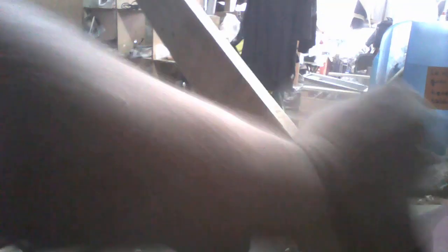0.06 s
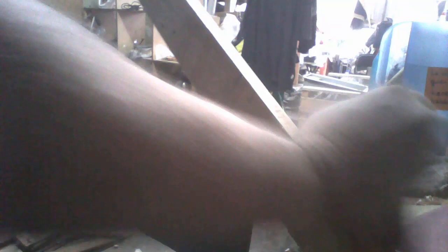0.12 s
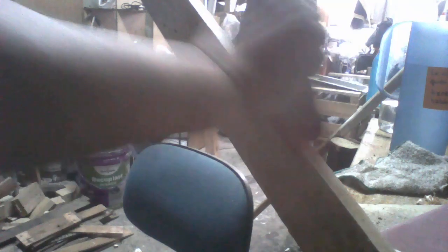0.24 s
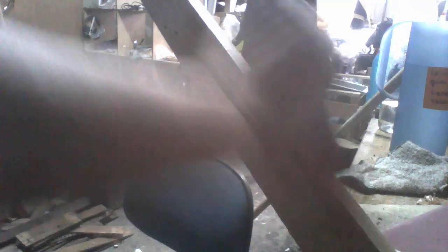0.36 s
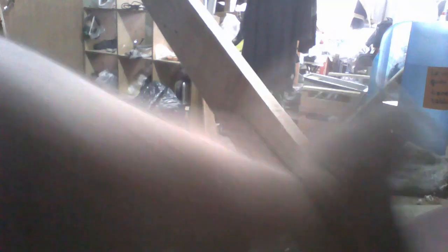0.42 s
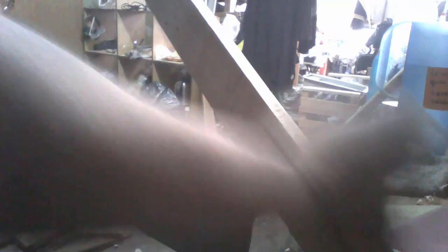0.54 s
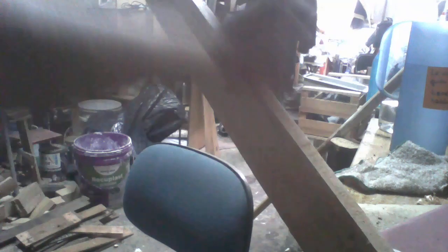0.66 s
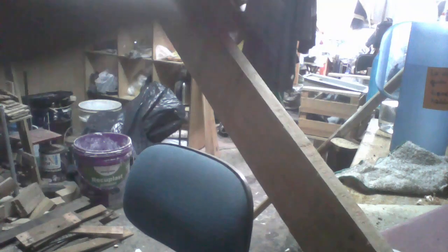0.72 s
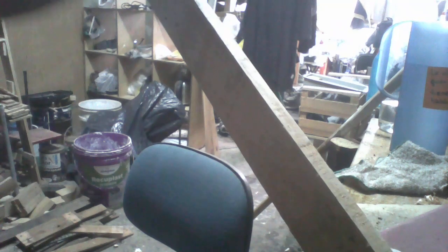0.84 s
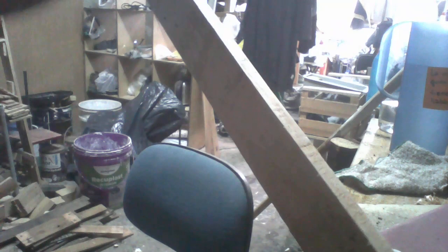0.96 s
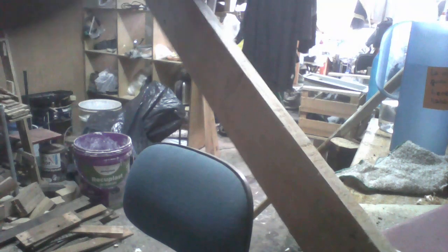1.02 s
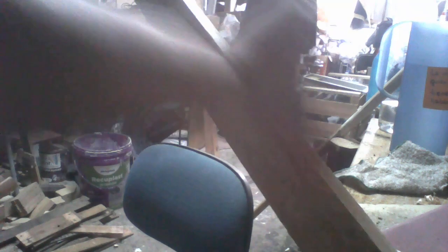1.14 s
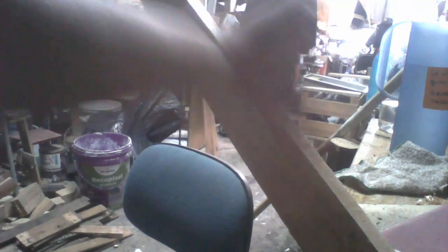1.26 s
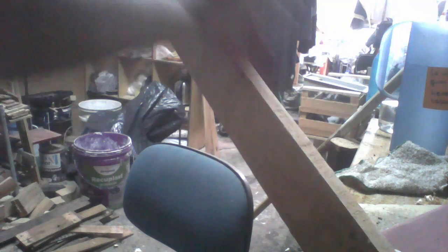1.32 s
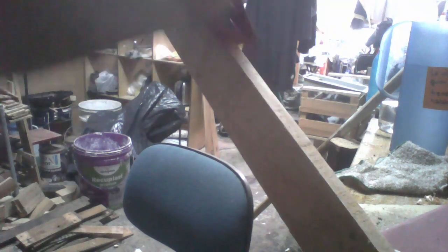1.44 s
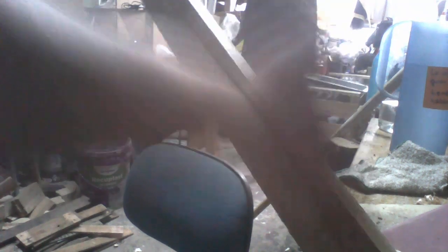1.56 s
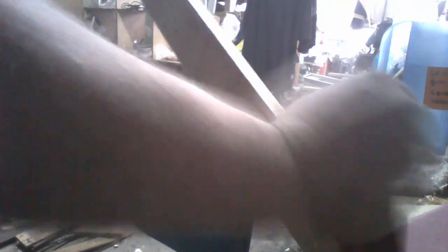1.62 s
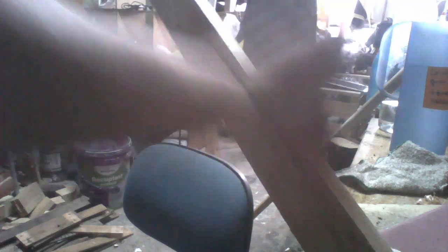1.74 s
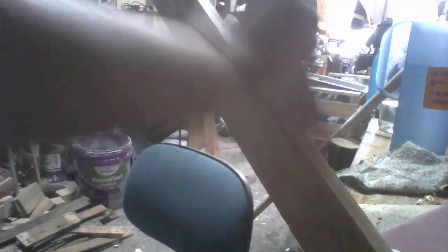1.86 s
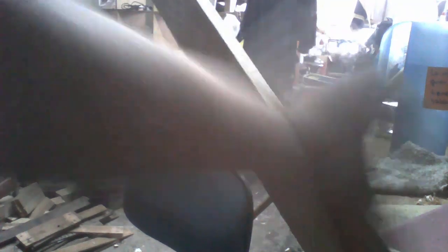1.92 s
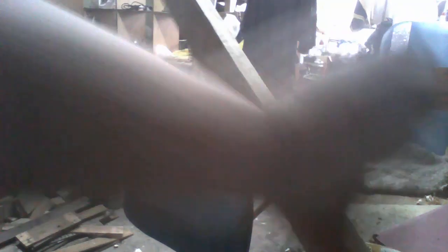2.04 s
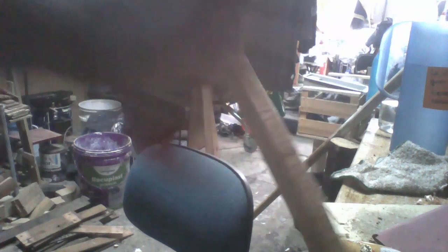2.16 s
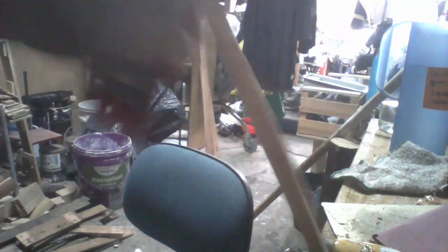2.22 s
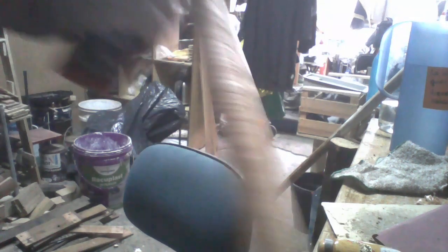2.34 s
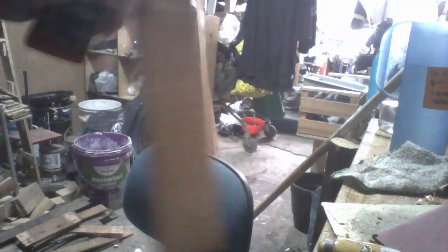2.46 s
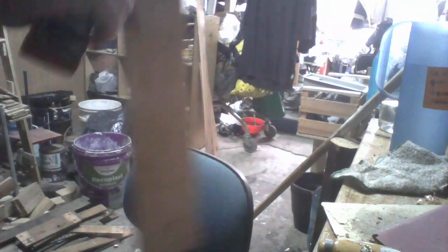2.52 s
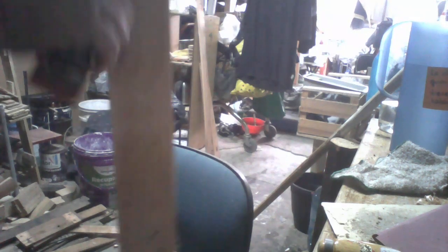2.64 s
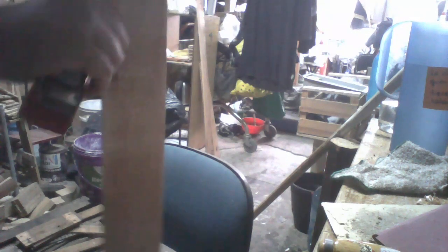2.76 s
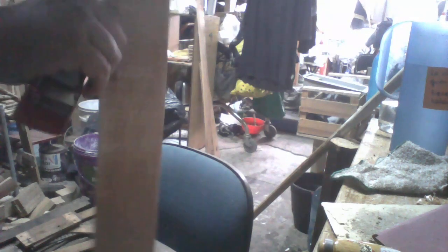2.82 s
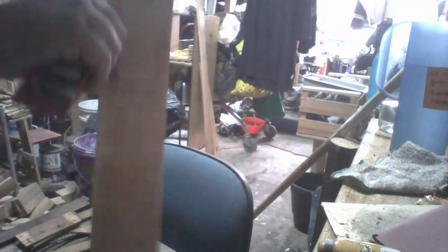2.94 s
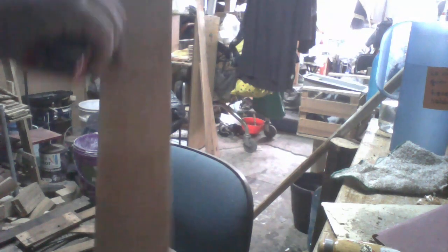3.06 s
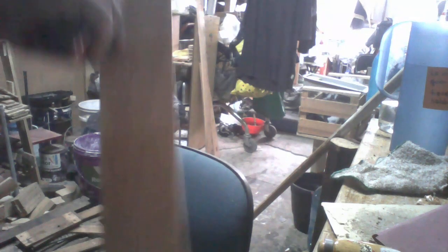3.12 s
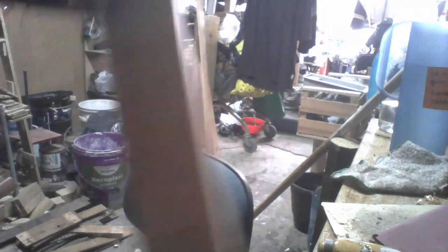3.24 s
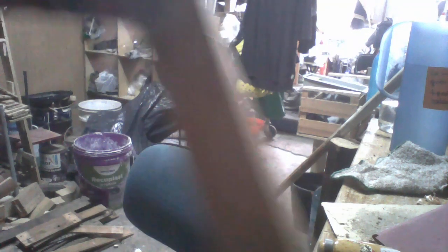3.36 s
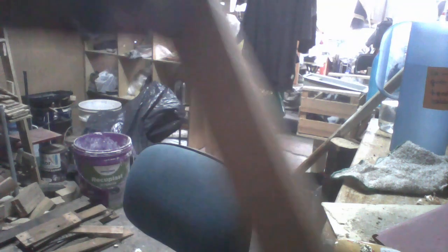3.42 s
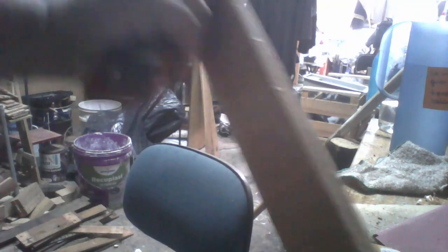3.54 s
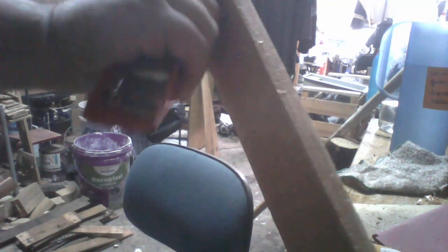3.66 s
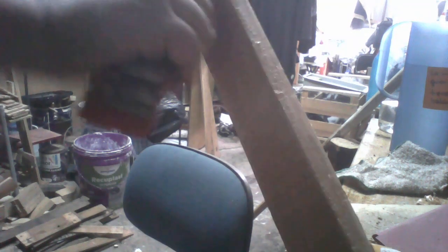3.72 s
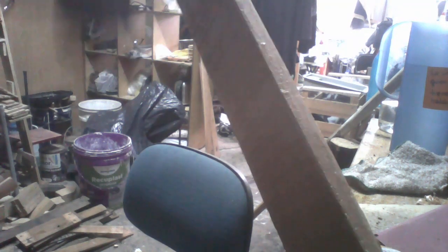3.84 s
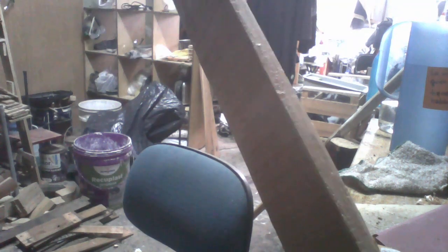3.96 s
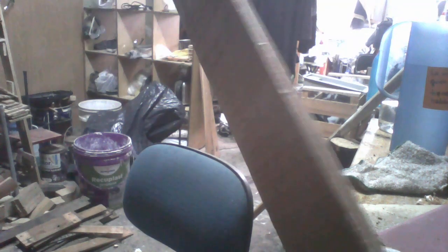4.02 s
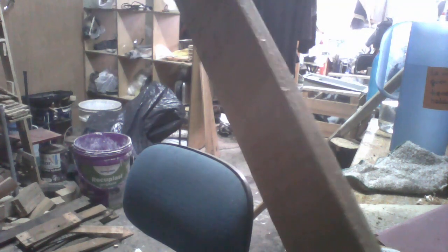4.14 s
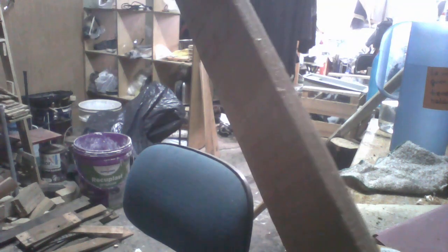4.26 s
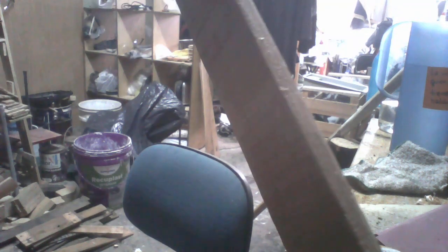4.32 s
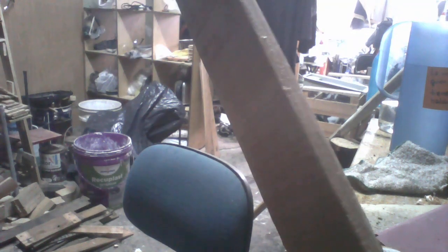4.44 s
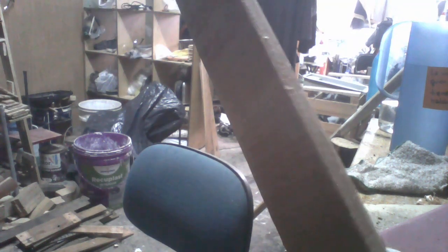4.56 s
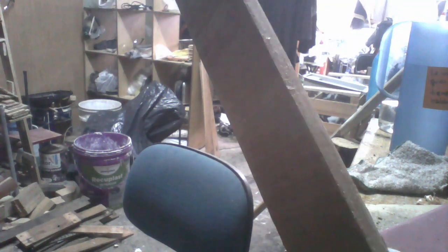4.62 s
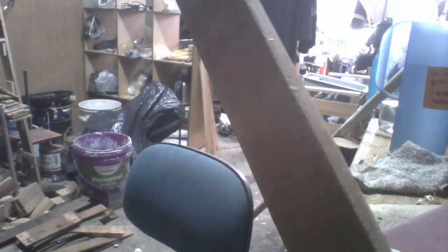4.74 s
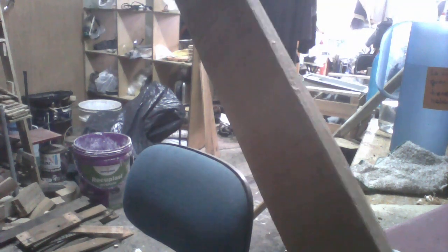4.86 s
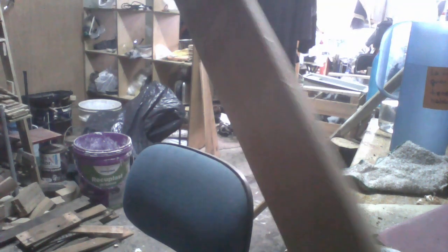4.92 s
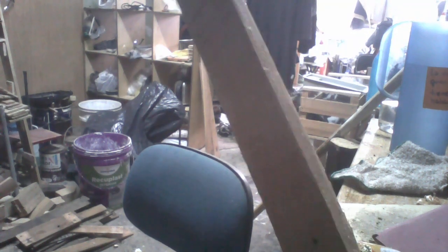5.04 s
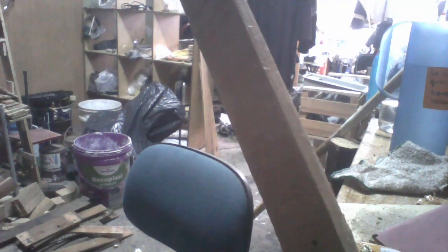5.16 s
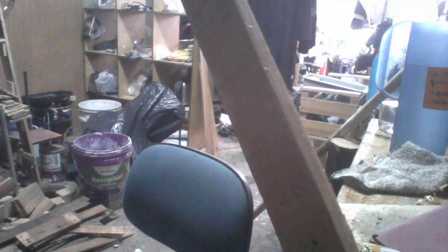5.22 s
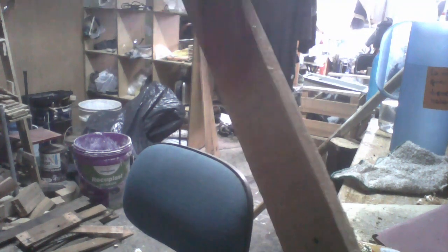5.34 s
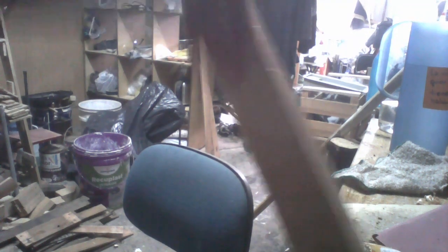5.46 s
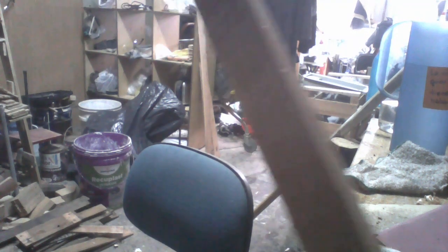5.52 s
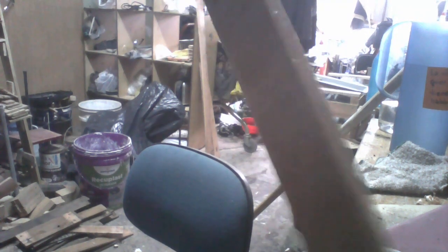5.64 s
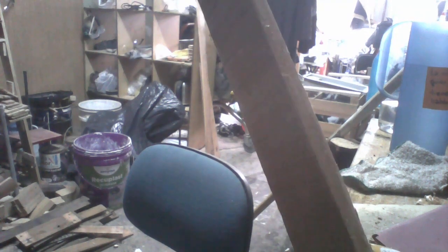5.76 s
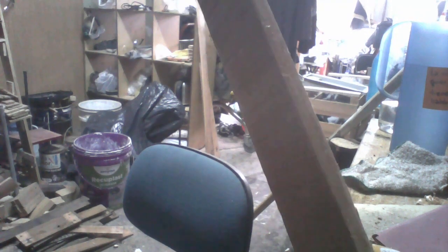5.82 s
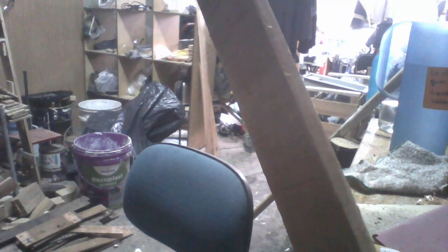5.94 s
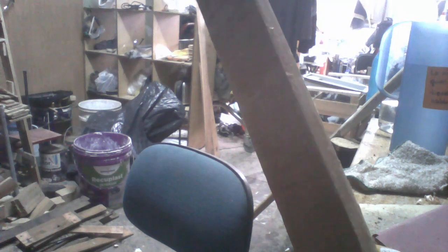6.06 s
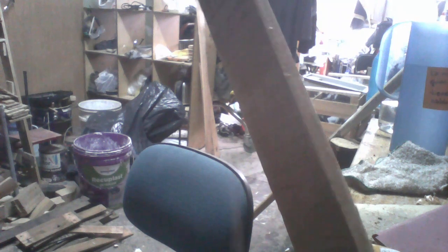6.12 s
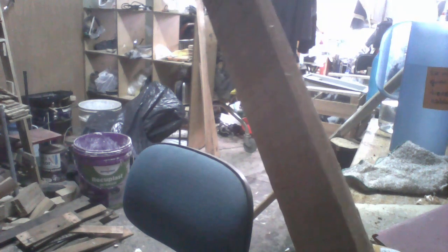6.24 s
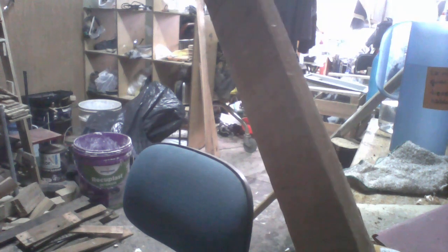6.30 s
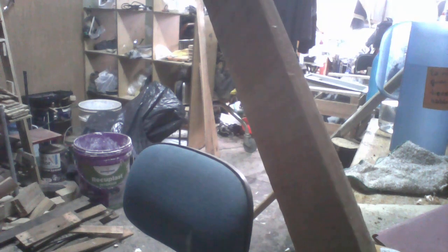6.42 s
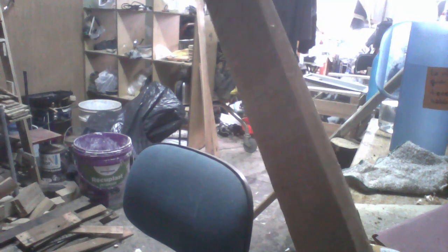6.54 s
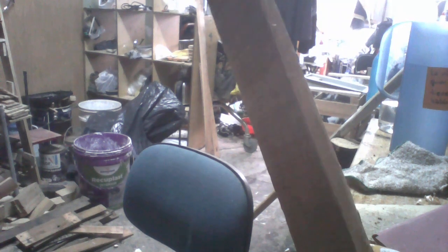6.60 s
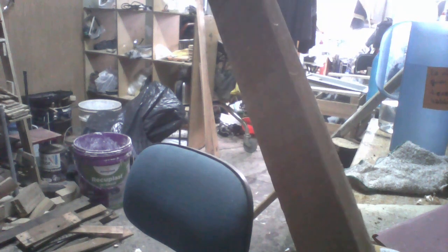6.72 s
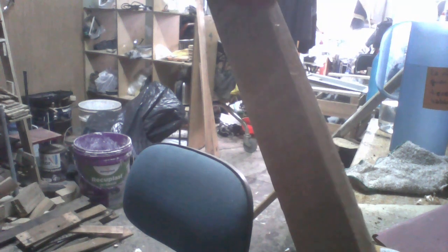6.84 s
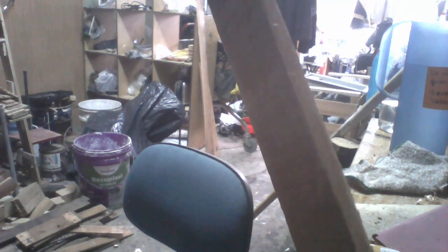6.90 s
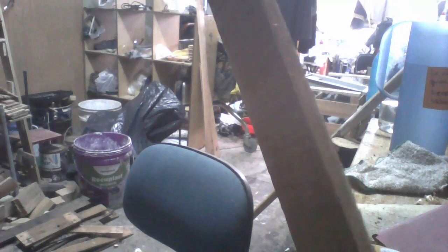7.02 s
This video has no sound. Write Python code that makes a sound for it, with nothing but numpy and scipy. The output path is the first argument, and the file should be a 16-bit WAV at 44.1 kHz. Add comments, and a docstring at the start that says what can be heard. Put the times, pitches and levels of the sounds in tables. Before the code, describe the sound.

Rapid uneven scraping of wood, fibres tearing and the board humming, with snags and tiny squeaks. A mostly quiet pause follows, holding soft dry hand rubbing, a heavy board thump and a hard woody clack. Then broad forceful strokes return with knocks and crunching until the end. Close single microphone, short room reverberation, deep rumble following the shaking, clipped peaks and faint background air.

```python
"""A hand scraper works to and fro along a wooden board: torn fibres hiss, stick-slip rasps, board modes drone.
From the start the edge also catches on the grain, ticking and jolting the board, and at moments it squeaks.
In a pause the board is turned in the hand with dry rubbing and set down with a thump; then a hard piece clacks.
Scraping resumes, with further thumps among the strokes; the loudest blows overload.
Short reverberation, a rumble that follows the shaking and steady air noise lie beneath."""
import sys
import numpy as np
from scipy import signal
from scipy.fft import rfft, irfft
from scipy.io import wavfile

SR = 44100
rng = np.random.default_rng(int(sys.argv[2]) if len(sys.argv) > 2 else 0)


def output_pcm(signal):
    """Save a mono or channel-first signal as 16-bit PCM at the path in sys.argv[1].

    Samples are clipped to [-1, 1] before scaling.
    """
    pcm = np.clip(np.atleast_2d(signal).T, -1, 1) * 32767
    wavfile.write(sys.argv[1], SR, np.round(pcm).astype(np.int16))


N = 312228
TIME = np.arange(N) / SR
RING = TIME[:SR // 2]  # time axis of short sounds and impulse responses, 0.5 s

# Levels in the tables are relative: each source applies its own overall gain.
# scraper strokes: fastest moment t/s, rise/s, fall/s, hiss level/dB, rasp level/dB, drone level/dB
SCRAPER_STROKES = [(0.025, 0.3, 0.13, -24.5, -25, -8.5), (0.175, .04, 0.071, -33, -32, -28),
                   (0.265, 0.065, .05, -30.5, -32.5, -21), (0.445, 0.14, 0.063, -23, -29, -10.5),
                   (0.595, 0.036, 0.068, -33, -23.5, -19), (0.64, 0.12, 0.14, -25.5, -24.5, -12.5),
                   (0.78, 0.087, 0.15, -32.5, -32.5, -24), (1.14, 0.21, .11, -24, -26.5, -11.5),
                   (1.285, 0.082, .06, -31, -34, -30), (1.355, 0.074, 0.083, -33, -32.5, -23.5),
                   (1.605, 0.15, 0.085, -23, -22.5, -5), (1.79, 0.16, 0.049, -29, -26.5, -16.5),
                   (1.92, 0.098, 0.077, -26, -24, -12), (2.355, 0.07, 0.07, -35, -27, -20.5),
                   (4.62, 0.12, 0.12, -20, -24.5, -9.5), (4.878, 0.0055, .12, -35, -33, -54),
                   (4.995, .11, 0.098, -23.5, -22, -17.5), (5.18, 0.088, 0.13, -34.5, -41, -38),
                   (5.315, 0.13, 0.094, -23.5, -23.5, -14), (5.49, 0.056, .06, -41, -39.5, -34),
                   (5.668, 0.0072, 0.1, -32.5, -35.5, -46), (6.035, 0.14, 0.068, -20.5, -26, -5.5),
                   (6.235, 0.23, 0.11, -31, -31, -25), (6.455, 0.14, 0.062, -21.5, -27.5, -11),
                   (6.59, 0.16, 0.086, -31.5, -28.5, -21.5), (6.785, .11, 0.069, -18, -24, -5.5),
                   (6.93, 0.22, 0.29, -33.5, -35.5, -26.5), (7.08, 0.058, .1, -26, -29, -15)]
# slides of the board through the hand: fastest moment t/s, rise/s, fall/s, hiss level/dB, ringing level/dB
BOARD_SLIDES = [(2.05, .1, 0.41, -49.5, -50), (2.5, 0.18, 0.1, -43.5, -42), (2.61, .025, 0.065, -52, -41),
                (2.76, 0.11, 0.06, -40.5, -48), (2.83, .03, 0.03, -34.5, -37),
                (3.11, 0.39, 0.31, -43, -46.5), (3.34, 0.037, 0.11, -38, -45),
                (3.49, .16, 0.15, -33, -41.5), (3.95, 0.59, 0.25, -48, -57.5),
                (4.26, 0.095, 0.046, -34.5, -56), (4.39, 0.051, 0.058, -43, -46)]
# sharp contacts, edge snagging or wood hit: t/s, tick level/dB, jolt level/dB, tick centre f/Hz
SHARP_CONTACTS = [(0.015, 0.5, -19, 950), (0.221, -11, -19.5, 2460), (0.249, -30, -7.5, 900),
                  (0.383, -0.5, -12, 930), (0.419, -13, -3.5, 905), (0.454, -7, -8.5, 900),
                  (0.470, -7, 0.5, 900), (0.643, -7.5, -19, 2260), (1.158, -28, -10.5, 890),
                  (1.185, 0, 2.5, 1400), (1.314, -10, -15, 5600), (1.384, -9.5, -12, 5500),
                  (1.491, -12, -12.5, 2070), (1.587, 2.5, 1.5, 860), (1.883, -11.5, -13, 775),
                  (1.913, -5.5, -2, 1200), (2.144, -31.5, -52, 2380), (2.32, -20.5, -22, 3240),
                  (2.359, -10, -19, 1060), (3.507, -3, -5.5, 750), (5.188, -10, -6, 1006),
                  (5.224, -2, -28, 1480), (5.663, -23, -38, 1270), (5.741, -2.5, 3.5, 895),
                  (5.976, -25, -1, 790), (6.472, -6, 0, 1510), (6.515, -7.5, -7, 1650),
                  (6.592, -14.5, -23, 4600), (6.727, -6, -1, 840), (6.805, -2, 0.5, 866)]
# bumps of the board's end: t/s, level/dB, contact time scale/ms
BOARD_THUMPS = [(3.504, -2, 1.55), (3.513, -7, 1.2), (5.18, -7.5, 5.3), (5.734, 1, 1.3),
                (5.741, -5.5, 0.53), (5.754, -9, 0.33)]
# landings of a hard piece: t/s, level/dB
PIECE_CLACKS = [(4.119, -5.5), (4.135, 2)]
# brief squeaks of the edge: t/s, mean f/Hz, level/dB, length/s
EDGE_SQUEAKS = [(1.312, 5740, -30, 0.0095), (1.383, 5540, -29, 0.0051), (2.116, 3320, -52, 0.007),
                (2.326, 3150, -33.5, 0.024), (5.226, 5540, -19, 0.0043), (6.588, 4720, -26.5, 0.011),
                (6.605, 5100, -46, 0.047)]

# free modes of the board: f/Hz, level/dB, t60/s
BOARD_MODES = [(133.7, -16, 0.4), (167, -18, 0.15), (268, -4.5, 0.38), (305.3, -3.5, 0.067),
               (325.8, -9.5, 0.46), (359.7, -15.5, 0.38), (396.6, 0, 0.081), (445, -6.5, 0.05),
               (471, -4.5, 0.57), (532.4, -8, 0.9), (647, -14, 0.22), (699, -2.5, 0.16),
               (803.4, -12.5, 0.33), (946, -32.5, 0.19)]
# free modes of the hard piece: f/Hz, level/dB, t60/s
PIECE_MODES = [(339, -12, 0.25), (532, -8, 0.2), (688, -8.5, 0.12), (1263, -1.5, 0.047), (1420, -11, 0.11),
               (1616, -13, 0.13), (1640, -7.5, 0.054), (1657, 4, 0.19), (2100, 6.5, 0.056),
               (2290, -1, 0.125), (2400, -23, .18), (2810, -15, 0.31), (3500, -21, 0.21)]
# resonances of the scraping contact: f/Hz, width/Hz, level/dB
EDGE_RESONANCES = [(919, 79, -25.5), (1160, 43, -11.5), (1340, 180, -17), (1615, 100, -1.5),
                   (2092, 170, 4.5), (2620, 110, -11.5), (3470, 88, -3.5), (4850, 60, -4)]
# resonances of a deep bite: f/Hz, width/Hz, level/dB
BITE_RESONANCES = [(822, 43, -3.5), (940, 93, -1), (1460, 300, -0.5)]
# faint tones drawn out by light rubbing: f/Hz, width/Hz, level/dB
RUB_RESONANCES = [(580, 2.5, -1.5), (654, 15, -0.5), (1100, 27, 0), (1633, 50, -4), (2256, 46, 9.5),
                  (2790, 36, 2.5), (3460, 45, -4.5), (4300, 35, -5), (5700, 55, -3), (7800, 250, -24)]

# spectrum of torn fibres: f/Hz, level/dB
HISS_SPECTRUM = [(1500, -8.5), (3800, -8), (5000, -4), (6000, -6), (7200, 1), (8800, -0.5), (10500, -2.5),
                 (12500, -6.5), (15500, -27.5)]
# spectrum of stick-slip: f/Hz, level/dB
RASP_SPECTRUM = [(350, -3), (700, -14.5), (950, -3), (1400, -0.5), (2200, -7), (3200, -15.5), (4500, -16),
                 (9000, -39)]
# spectrum of the board's body: f/Hz, level/dB
WOOD_SPECTRUM = [(40, -25.5), (90, -14), (125, 1.5), (165, 0), (215, -9.5), (270, -3), (345, 4), (520, -1),
                 (680, -17), (1000, -16), (2000, -22), (5000, -92)]
# spectrum of the noise in a thump: f/Hz, level/dB
KNOCK_SPECTRUM = [(30, -19), (120, -3.5), (320, 3.5), (600, 0), (1000, -4), (2200, -2.5), (5000, -8),
                  (14000, -12)]
# spectrum of the crack in a clack: f/Hz, level/dB
CRACK_SPECTRUM = [(130, -6), (260, -15), (500, -8.5), (900, -14), (1550, -0.5), (2400, -7.5), (3500, -12),
                  (5000, -15.5), (8000, -21.5), (15000, -40)]
# spectrum of ticks and splinters: f/Hz, level/dB
TICK_SPECTRUM = [(200, 16), (800, 6), (2200, 0.5), (4000, -8), (8000, -5.5), (15000, -18.5)]
# spectrum of dry rubbing by the hand: f/Hz, level/dB
SKIN_SPECTRUM = [(300, -2.5), (650, -44), (1400, 2.5), (2300, 1), (4500, 0), (8500, 4), (12000, -4),
                 (15500, -16)]
# spectrum of the deep rumble: f/Hz, level/dB
RUMBLE_SPECTRUM = [(15, -10), (37, 4), (52, -2.5), (85, -6), (130, -13.5), (300, -26.5), (1000, -42.5)]
# spectrum of the steady air noise: f/Hz, level/dB
AIR_SPECTRUM = [(30, 29), (120, 17), (250, 6.5), (600, 5.5), (1000, 3.5), (2200, -8), (4000, -28),
                (8000, -36), (15000, -7)]
# deep rumble per unit of shaking, joined by straight lines: t/s, level/dB
RUMBLE_LEVELS = [(1.5, -20.5), (5.3, -18), (6.4, -13)]

# a movement dies down by its swing over its rise and its fall; a shape over 1 rounds its top
HISS_SWING_DB, RASP_SWING_DB, DRONE_SWING_DB, STROKE_SHAPE = 24, 18.5, 24, 1.334
SLIDE_SWING_DB, SLIDE_SHAPE = 13.5, 0.83
DRONE_LAG_S, DRONE_LINGER = 0.016, 1.15  # the board answers late; its fall is stretched by the second
REST_DB, SHAKE_POWER = -45, 0.81  # rumble at rest, and its growth with the shaking
SETTLE_S, SHAKE_HZ = 0.1, 407  # time constant of the shaking power, top of the band that shakes
TOP_HZ = 15700  # upper edge of the microphone's band


def undb(db):
    """Level: decibels become an amplitude ratio."""
    return 10 ** (np.asarray(db) / 20)


def unit(x):
    """Normalisation by power: scale to rms 1."""
    return x / np.sqrt(np.mean(x ** 2))


def blow(x):
    """Normalisation by energy: scale a short sound to that of 10 ms at rms 1."""
    return x / np.sqrt(np.sum(x ** 2) / (SR / 100))


def through(x, response):
    """Linear response: convolve a sound with an impulse response."""
    return signal.fftconvolve(x, response)[:len(x)]


def add(track, s, sound):
    """Superposition: mix a sound into the track from time s, in seconds."""
    start = max(int(s * SR), 0)
    track[start:start + len(sound)] += sound[:N - start]


def colour(x, points, peaks=(), size=4096):
    """Minimum-phase filtering: follow (f, dB) points, lifted at (f, width, dB) resonances."""
    f = np.maximum(np.fft.rfftfreq(size, 1 / SR), 1)
    hz, db = np.transpose(points)
    curve = np.interp(np.log(f), np.log(hz), db)
    for centre, width, lift in peaks:
        curve = curve + lift / (1 + (2 * (f - centre) / width) ** 2)
    # folding the cepstrum onto positive time makes the filter causal
    cepstrum = irfft(np.log(undb(curve)))
    cepstrum[1:size // 2] *= 2
    cepstrum[size // 2 + 1:] = 0
    return through(x, irfft(np.exp(rfft(cepstrum))))


def fade(t60):
    """Exponential damping: 60 dB down after t60 seconds."""
    return np.exp(-np.log(1000) * RING / t60)


def burst(t60):
    """Damped noise: a random burst that dies exponentially."""
    return rng.standard_normal(len(RING)) * fade(t60)


def ring(modes):
    """Modal superposition: the impulse response is a sum of damped sines, one per (f, dB, t60) mode."""
    response = 0
    for hz, db, t60 in modes:
        response = response + undb(db) * fade(t60) * np.sin(2 * np.pi * hz * RING)
    return response


def walk(rate):
    """Slow random variation: rate random values a second, joined by lines and scaled to rms 1."""
    steps = rng.standard_normal(N)
    return unit(np.interp(TIME * rate, np.arange(N), steps))


def grains(rate, spread_db):
    """Shot noise: random clicks, on average rate a second, of uneven size and either sign."""
    size = undb(spread_db * np.clip(rng.standard_normal(N), -2, 2))
    sign = rng.choice([-1, 1], N)
    return unit(size * sign * (rng.random(N) < rate / SR))


def resonate(x, peaks, wander_db, rate):
    """Driven resonance: each (f, width, dB) peak swells and fades as the contact point moves."""
    out = 0
    for hz, width, db in peaks:
        b, a = signal.iirpeak(hz, hz / width, fs=SR)
        tone = unit(signal.lfilter(b, a, x))
        out = out + tone * undb(db + wander_db * np.tanh(walk(rate)))
    return unit(out)


def swells(table, swing_db, shape, column, lag=0, linger=1):
    """Friction grows with speed: each movement gathers speed, peaks at the column's level and slows again."""
    power = 0
    for row in table:
        s, rise, fall = row[:3]
        age = TIME - s - lag
        away = np.maximum(-age / rise, age / (fall * linger))
        level_db = row[column] - swing_db * np.minimum(away ** shape, 10)
        power = power + undb(level_db) ** 2
    return np.sqrt(power)


def scraper():
    """Stick-slip friction: slips rasp and drive the board, finer fibre breaks hiss, uneven grain adds flutter."""
    hiss_gain = swells(SCRAPER_STROKES, HISS_SWING_DB, STROKE_SHAPE, column=3)
    rasp_gain = swells(SCRAPER_STROKES, RASP_SWING_DB, STROKE_SHAPE, column=4)
    drone_gain = swells(SCRAPER_STROKES, DRONE_SWING_DB, STROKE_SHAPE, column=5,
                        lag=DRONE_LAG_S, linger=DRONE_LINGER)
    flutter = undb(walk(80))
    slips = grains(rate=900, spread_db=3.5) * flutter ** 2
    fibres = grains(rate=9000, spread_db=4) * flutter
    grit = slips + 0.61 * grains(rate=7100, spread_db=3.5)

    hiss = unit(glance(rock(colour(fibres, HISS_SPECTRUM))))

    edge_tones = resonate(grit, EDGE_RESONANCES, wander_db=10.5, rate=9.1)
    rasp = unit(glance(unit(colour(grit, RASP_SPECTRUM)) + undb(-2) * edge_tones))
    rasp = unit(rasp + undb(-1.5) * splinters())

    body = unit(colour(slips, WOOD_SPECTRUM))
    ringing = unit(through(slips, ring(BOARD_MODES)))
    drone = unit(undb(8.5) * body + ringing)

    # a deep bite lets go more abruptly, so the mid-range crunch grows faster than the drone
    crunch = resonate(slips, BITE_RESONANCES, wander_db=18.0, rate=13) * drone_gain ** 1.47

    friction = undb(1.46) * hiss * hiss_gain + undb(1.76) * rasp * rasp_gain
    return friction + undb(-1.5) * drone * drone_gain + undb(-8) * crunch


def rock(x):
    """Two-path interference: the edge rocks in the hand, so its hiss turns now brighter, now duller."""
    return x + 0.45 * np.tanh(walk(9)) * np.roll(x, 2)


def glance(x):
    """Comb interference: a weak reflection off the board's face changes its path as the hand travels."""
    lag_s = 0.0014 + 0.0008 * np.tanh(walk(12))
    return x + 0.25 * np.interp(TIME - lag_s, TIME, x)


def splinters():
    """Brittle fracture: now and then a bigger splinter breaks off with a short snap."""
    breaks = grains(rate=57, spread_db=11)
    return unit(colour(through(breaks, burst(0.0088)), TICK_SPECTRUM))


def catches():
    """Impulsive excitation: at each sharp contact the wood ticks and the board is jolted."""
    out = np.zeros(N)
    ringing = blow(ring(BOARD_MODES) * fade(0.44))  # damped beyond the free modes
    shove = blow(colour(fade(0.0013), WOOD_SPECTRUM))
    jolt = blow(ringing + undb(-2) * shove)
    for s, tick_db, jolt_db, hz in SHARP_CONTACTS:
        snap = burst(0.0039) + undb(-10.5) * burst(0.082)
        tick = blow(colour(snap, TICK_SPECTRUM, [(hz, 0.29 * hz, 9)]))
        add(out, s, undb(tick_db - 7.5) * tick + undb(jolt_db - 7.5) * jolt)
    return out


def thumps():
    """Impact of a heavy body: the board lands, and a longer contact gives a duller blow."""
    out = np.zeros(N)
    for s, db, contact_ms in BOARD_THUMPS:
        age = RING * 1000 / contact_ms
        push = age * np.exp(-4 * age)  # contact force, greatest at a quarter of the time scale
        ringing = blow(ring(BOARD_MODES) * fade(0.93))
        knock = blow(colour(burst(0.15), KNOCK_SPECTRUM))
        add(out, s, undb(db) * blow(through(undb(-6) * ringing + knock, push)))
    return out


def clacks():
    """Impact of a hard body: a sharp crack together with the piece's bright modal ring."""
    out = np.zeros(N)
    for s, db in PIECE_CLACKS:
        crack = blow(colour(burst(0.035), CRACK_SPECTRUM))
        ringing = blow(ring(PIECE_MODES))
        add(out, s, undb(db) * (undb(-4.5) * crack + undb(-4.0) * ringing))
    return out


def squeaks():
    """Synchronised stick-slip: for a moment the slips fall into step and give a rough whistle."""
    out = np.zeros(N)
    for s, hz, db, length in EDGE_SQUEAKS:
        pitch_hz = hz * (1 + 0.045 * walk(760)[:len(RING)])
        phase = 2 * np.pi * np.cumsum(pitch_hz) / SR
        envelope = np.sin(np.pi * np.sqrt(np.minimum(RING / length, 1)))  # quick rise, slower fall
        add(out, s, undb(db + 9.5) * np.sin(phase) * envelope)
    return out


def handling():
    """Dry sliding friction: light rubbing while the board is turned, with faint resonant tones."""
    rub = grains(rate=7300, spread_db=2) * undb(2 * walk(40))
    hiss = unit(colour(rub, SKIN_SPECTRUM))
    tones = resonate(rub, RUB_RESONANCES, wander_db=8.5, rate=6.68)
    hiss_gain = swells(BOARD_SLIDES, SLIDE_SWING_DB, SLIDE_SHAPE, column=3)
    tone_gain = swells(BOARD_SLIDES, SLIDE_SWING_DB, SLIDE_SHAPE, column=4)
    return hiss * hiss_gain + tones * tone_gain


def workshop(x, wet_db, t60_low=0.42, t60_high=0.34, high_db=-5, split_hz=1500):
    """Diffuse reverberation: a cluttered room gives a dense short tail, weaker in the treble."""
    low = signal.sosfilt(signal.butter(2, split_hz, fs=SR, output="sos"), burst(t60_low))
    high = signal.sosfilt(signal.butter(2, split_hz, "high", fs=SR, output="sos"), burst(t60_high))
    onset = 1 - np.exp(-RING / 0.00097)
    tail = (low + undb(high_db) * high) * onset / np.linalg.norm(fade(t60_low))
    return x + undb(wet_db) * through(x, tail)


def shudder(work):
    """Energy build-up and decay: a deep rumble grows with the shaking of the wood and settles after it."""
    low = signal.sosfilt(signal.butter(2, SHAKE_HZ, fs=SR, output="sos"), work)
    step = 1 / (SETTLE_S * SR)
    shaking = np.sqrt(signal.lfilter([step], [1, step - 1], low ** 2))  # running rms
    full = undb(np.interp(TIME, *np.transpose(RUMBLE_LEVELS)))
    rumble = unit(colour(rng.standard_normal(N), RUMBLE_SPECTRUM))
    return rumble * np.hypot(undb(REST_DB), full * shaking ** SHAKE_POWER)


def still_air():
    """Stationary noise: a steady coloured background."""
    return undb(-43.5) * unit(colour(rng.standard_normal(N), AIR_SPECTRUM))


def scene():
    """Superposition of sources: scraping and blows in the room, over rumble and still air."""
    scraping = workshop(scraper() + catches() + squeaks() + handling(), wet_db=-7)
    blows = workshop(thumps() + clacks(), wet_db=-4)
    work = scraping + blows
    return (work + shudder(work) + still_air())[None]


def record(dry):
    """Overload and band limiting: the microphone clips at full scale, then the top is cut."""
    clipped = np.clip(dry, -1, 1)
    return signal.sosfilt(signal.ellip(10, 0.1, 70, TOP_HZ, fs=SR, output="sos"), clipped)


dry = scene()
out = record(dry)
output_pcm(out)
```